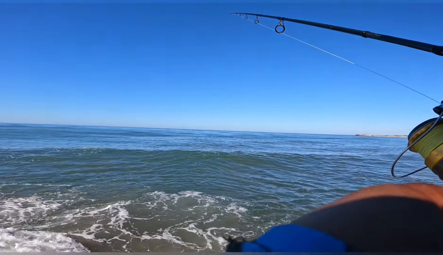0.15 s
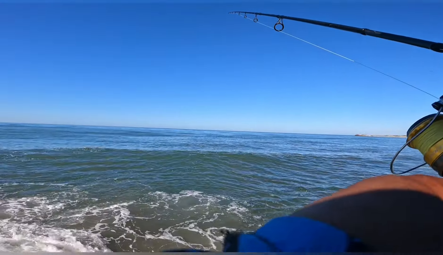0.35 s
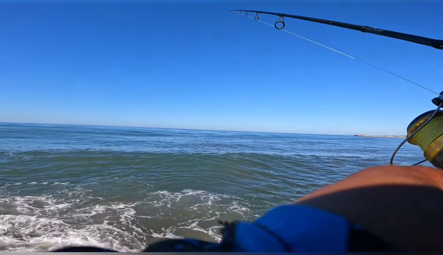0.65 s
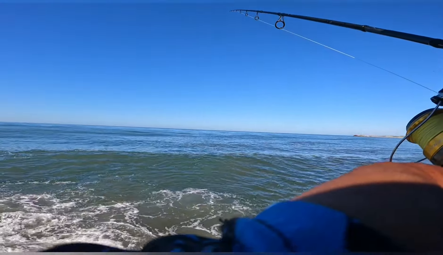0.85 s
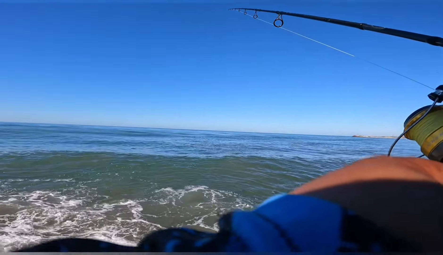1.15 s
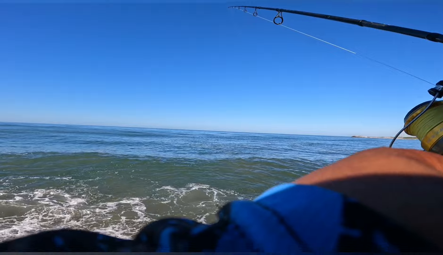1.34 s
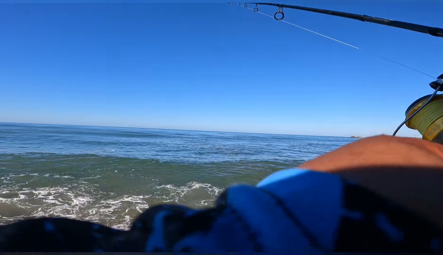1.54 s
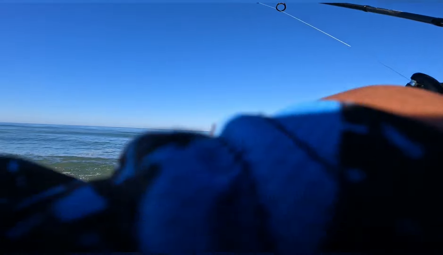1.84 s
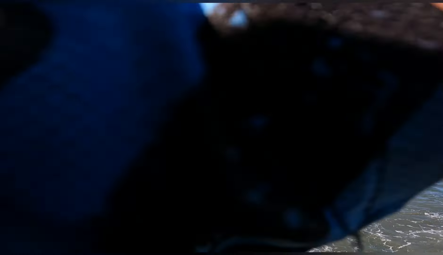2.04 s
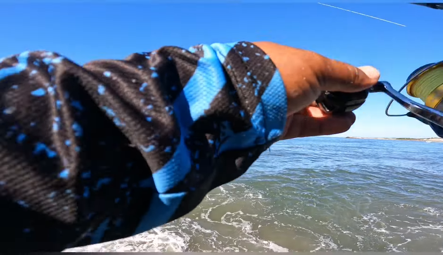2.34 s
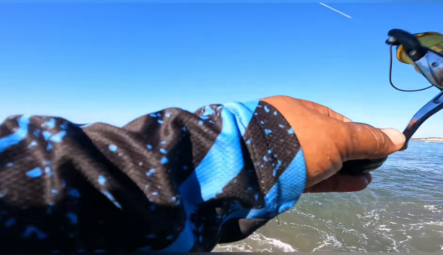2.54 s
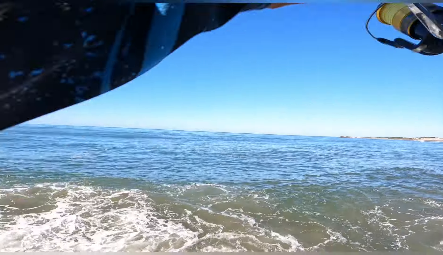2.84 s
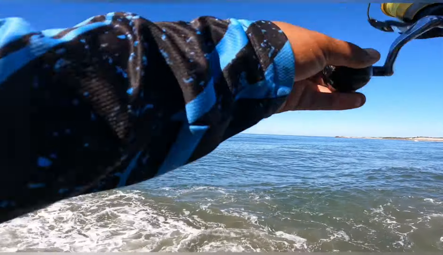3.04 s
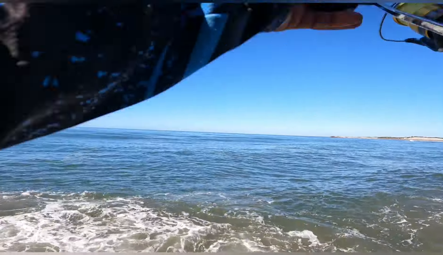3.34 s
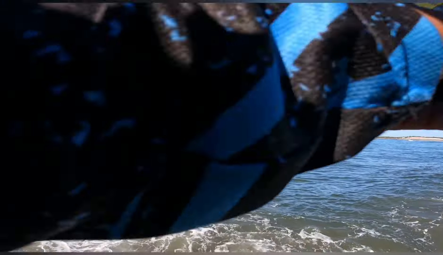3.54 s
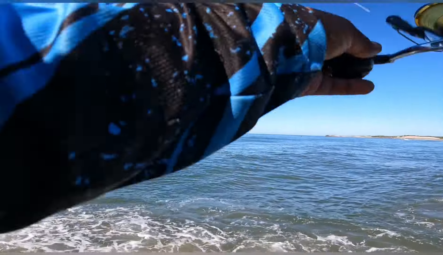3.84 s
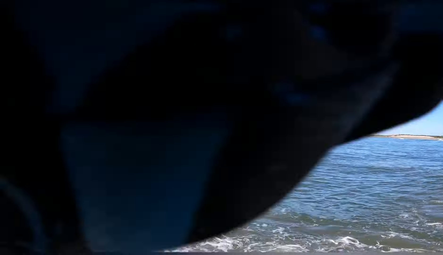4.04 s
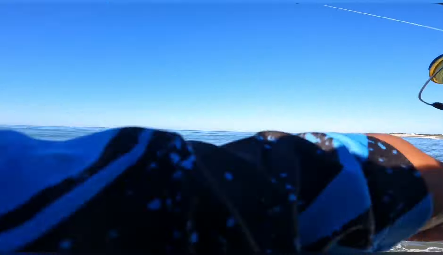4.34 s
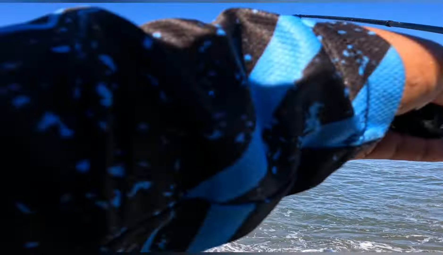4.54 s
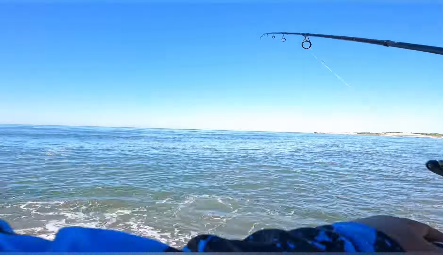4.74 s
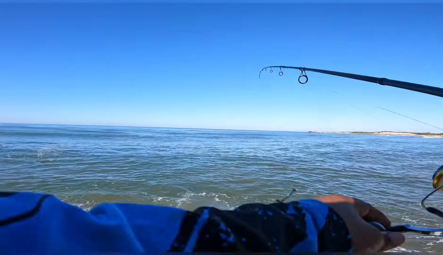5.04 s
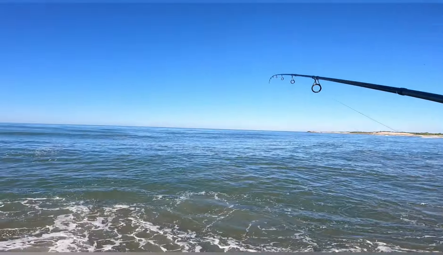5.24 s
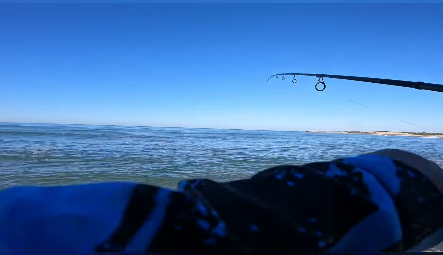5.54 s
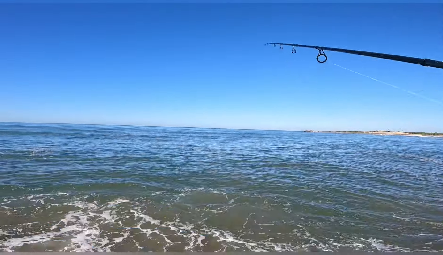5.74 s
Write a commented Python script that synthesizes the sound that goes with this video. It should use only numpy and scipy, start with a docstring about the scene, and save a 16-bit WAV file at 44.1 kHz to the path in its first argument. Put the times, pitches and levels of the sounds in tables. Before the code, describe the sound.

Outdoor seaside fishing heard through a closed waterproof case: deep wind rumble and boxy, tumbling water. The first waves are modest, with small slaps. Cloth scuffs the case near two seconds and soft hollow thuds of fishing tackle follow until about 3.3. Then the surf grows louder and fuller, slapping and plunging among rocks with faint spray and thin high fizz, joined by renewed lumpy gusts.

```python
"""A low roar of surf on jetty rocks and quick buffets of wind come first; a wave surges in halfway.
The microphone sits in a closed waterproof case, so most of the treble is muffled.
The surf is shaped noise and ringing bubbles that swell with each wave; slaps are short noise bands.
Spray and foam are noise with tiny pops; wind is low noise that strikes the case in lumps.
A sleeve brushes the case in bursts of noise, and fishing tackle knocks with a fading tone and a tick."""
import sys
import numpy as np
from scipy import signal
from scipy.fft import rfft, irfft, next_fast_len
from scipy.io import wavfile

SR = 44100
rng = np.random.default_rng(int(sys.argv[2]) if len(sys.argv) > 2 else 0)


def pcm_store(signal):
    """Save signal as 16-bit PCM."""
    levels = np.round(np.clip(np.atleast_2d(signal), -1, 1) * 32767)
    wavfile.write(sys.argv[1], SR, levels.astype(np.int16).T)


N = 259308
TIME = np.arange(N) / SR  # seconds


def gain_of(db):
    """Turns decibels into a factor for the sound pressure."""
    return 10 ** (np.asarray(db) / 20)


def evened(x):
    """Scales a sound to an average strength (rms) of 1."""
    return x / np.sqrt(np.mean(x ** 2) + 1e-20)


def level(rows):
    """Draws a level curve through the rows and gives its gain at every sample."""
    return gain_of(np.interp(TIME, *np.transpose(rows)))


# weak ringing of the case walls: (centre [Hz], width [Hz], lift [dB])
CASE_WALLS = [(645, 74, 0), (1730, 120, 1.5), (2170, 140, 2.5), (2790, 180, 1), (3450, 260, 4)]


def walls(hz):
    """The case walls resonate and lift the sound a little around a few pitches; gain in dB."""
    return sum(db / (1 + (2 * (hz - centre) / width) ** 2) for centre, width, db in CASE_WALLS)


def coloured(x, points):
    """Filters x to a balance of low and high pitches, adds the wall ringing and evens it to rms 1."""
    hz, db = np.transpose(points)
    size = next_fast_len(N + 8192)
    bins = np.fft.rfftfreq(size, 1 / SR)
    colour_db = np.interp(np.log(bins + 1), np.log(hz), db)
    shape = gain_of(colour_db + walls(bins))
    return evened(irfft(rfft(x, size) * shape, size)[:N])


def flutter(slow_hz, fast_hz, depth_db):
    """A gain that wanders irregularly: 40 slow sine waves with random starts, the slower the stronger."""
    rates = np.geomspace(slow_hz, fast_hz, 40)
    t = TIME[::64]
    turns = rates[:, None] * t + rng.random((len(rates), 1))
    wander = np.sin(2 * np.pi * turns).T @ rates ** -.5
    return gain_of(depth_db * np.interp(TIME, t, evened(wander)))


def pops(per_s, spread_db):
    """Single clicks at random moments, most small and a few large."""
    size = gain_of(spread_db * np.minimum(rng.exponential(1, N), 4))
    sign = rng.choice([-1, 1], N)
    return size * sign * (rng.random(N) < per_s / SR)


def bump(s, half_s):
    """A push that builds to 1 at time s and fades gently."""
    return 1 / np.cosh(np.minimum(abs(TIME - s) / half_s, 40))


def lump(noise, s, half_s, hz, span):
    """A short swell of noise from hz / span to hz * span, at rms 1 on its crest."""
    band = signal.butter(3, [hz / span, hz * span], "bandpass", fs=SR, output="sos")
    push = bump(s, half_s)
    sound = push * signal.sosfilt(band, noise)
    return sound * np.linalg.norm(push) / np.linalg.norm(sound)


# knocks of rod and reel, and at 2.083 s the sleeve thudding the case: (time [s], thud level [dB], tick level
# [dB])
TACKLE_KNOCKS = [(1.544, -28.5, -73), (2.083, -14, -80), (2.516, -10.5, -76), (2.784, -10, -71),
                 (3.315, -16, -68)]
# tone of the reel's metal: (frequency [Hz], level [dB])
METAL_COLOUR = [(2500, -13.5), (5000, -1), (7000, 1), (9000, -3.5), (11000, -10.5), (14000, -28)]
KNOCK_HZ, KNOCK_RISE_S = 263, 0.0034
THUD_T60_S, TICK_T60_S = 0.057, 0.06  # time to fade by 60 dB


def tackle():
    """Rod and reel knock, and once the sleeve thuds the case: each a dull fading tone through the angler's body
    and a tiny tick of metal noise."""
    out = np.zeros(N)
    metal = coloured(rng.standard_normal(N), METAL_COLOUR)
    for s, thud_db, tick_db in TACKLE_KNOCKS:
        age = np.clip(TIME - s, 0, 1)
        swell = (1 - np.exp(-age / KNOCK_RISE_S)) ** 2
        thud = gain_of(thud_db - 60 * age / THUD_T60_S) * np.sin(2 * np.pi * KNOCK_HZ * age)
        tick = gain_of(tick_db - 60 * age / TICK_T60_S) * metal
        out += swell * (thud + tick)
    return out


# sleeve brushes: (time [s], rustle level [dB], half length [s], thump level [dB], crisp share [0-1])
SLEEVE_BRUSHES = [(1.863, -56, 0.014, -43, 0.8), (1.952, -53.5, 0.05, -28, 0.34),
                  (2.059, -44.5, 0.008, -28, 0.9), (2.074, -40.5, 0.0029, -22.5, 0.8),
                  (2.089, -43.5, 0.0051, -20, 0.7), (2.115, -47.5, 0.0088, -30, 0.5),
                  (4.166, -39.5, 0.009, -31, 0.08), (4.57, -43.5, 0.016, -26, 0.73),
                  (4.624, -44.5, 0.016, -38, 0), (4.711, -51, 0.043, -42, 0.07),
                  (5.517, -50.5, 0.021, -39.5, 0.5)]
# tone of the crisp slips of cloth: (frequency [Hz], level [dB])
CLOTH_COLOUR = [(300, -16), (900, 4.5), (1500, 1.5), (2100, -1), (2700, 2.5), (3200, -8.5), (3800, -24.5),
                (4700, -22), (5800, -32.5), (7000, -51.5), (10000, -56.5), (12000, -80)]


def sleeve():
    """Cloth drags over the case in crisp tiny slips or a duller rustle, with a soft thump as it nudges."""
    grains = evened(pops(per_s=1200, spread_db=2.0)) + 0.63 * rng.standard_normal(N)
    slips = coloured(grains, CLOTH_COLOUR)
    slips = evened(slips * flutter(slow_hz=72.0, fast_hz=248, depth_db=0.5))
    drag = coloured(rng.standard_normal(N), [(300, -12.5), (900, 2.5), (2000, 6.5), (2600, -13.5),
                                             (3300, -19.5), (4000, -37.5), (7000, -78.0)])
    nudge = coloured(rng.standard_normal(N), [(15, -19.5), (50, 2.5), (110, -2.5), (300, -2.0),
                                              (700, -23.0), (1500, -56.0), (4000, -100)])
    out = np.zeros(N)
    for s, db, half_s, thump_db, crisp in SLEEVE_BRUSHES:
        rustle = np.sqrt(crisp) * slips + np.sqrt(1 - crisp) * drag
        out += bump(s, half_s) * (gain_of(db) * rustle + gain_of(thump_db) * nudge)
    return out


# strength of the wind rumble: (time [s], level [dB])
WIND_LEVEL = [(0, -23.5), (.8, -26.5), (1.15, -28.5), (1.72, -27), (1.8, -34), (2.5, -33), (2.73, -27),
              (3.08, -40.5), (3.5, -33), (3.8, -31.5), (3.9, -30.5), (4.35, -24), (4.72, -30.5),
              (5.05, -21), (5.25, -26.5), (5.88, -25)]
# share of large, slow eddies: (time [s], share [0-1])
LARGE_EDDIES = [(0, 0.29), (.8, 0.85), (2.8, 1), (3.6, 0.24), (5.88, 0.25)]
# tone of the large eddies: (frequency [Hz], level [dB])
LARGE_COLOUR = [(5, -25.5), (20, -10), (30, -7), (42, -2.5), (55, -6), (80, -10), (120, -9.5), (200, -25),
                (400, -37.5), (1200, -72.5), (3000, -115)]
# tone of the small eddies: (frequency [Hz], level [dB])
SMALL_COLOUR = [(5, -26), (20, -15), (38, -10.5), (55, 0.5), (70, 1), (100, -2.5), (135, -3), (200, -14),
                (400, -24), (1200, -72), (3000, -110)]
# single buffets: (time [s], level [dB], half length [s], centre frequency [Hz])
WIND_BUFFETS = [(0.013, -19, 0.0035, 257), (0.051, -19.5, 0.0033, 168), (0.264, -29.5, 0.006, 130),
                (0.39, -20, 0.0099, 150), (0.584, -19.5, 0.0091, 79), (1.083, -27, 0.04, 40),
                (1.68, -30.5, 0.02, 45), (2.793, -29.5, 0.0047, 69.5), (3.912, -21, .008, 115),
                (4.297, -23, 0.036, 95), (4.609, -21, 0.017, 50.2), (4.838, -18.5, 0.012, 94.4),
                (5.069, -20.5, 0.044, 67), (5.096, -19, 0.0075, 230), (5.22, -19, 0.011, 74.5),
                (5.511, -20, 0.017, 66)]


def wind():
    """Large, deep eddies and small, higher ones push unevenly on the case; single buffets strike it."""
    large = np.interp(TIME, *np.transpose(LARGE_EDDIES))
    eddies = np.sqrt(large) * coloured(rng.standard_normal(N), LARGE_COLOUR)
    eddies += np.sqrt(1 - large) * coloured(rng.standard_normal(N), SMALL_COLOUR)
    eddies *= flutter(slow_hz=8.4, fast_hz=29.2, depth_db=0.47)
    air = coloured(rng.standard_normal(N), [(600, -2), (3000, -49.5)])
    buffets = sum(gain_of(db) * lump(air, s, half_s, hz, span=1.93)
                  for s, db, half_s, hz in WIND_BUFFETS)
    return eddies * level(WIND_LEVEL) + buffets


# waves running onto the rocks: (arrival [s], hold [s], roar level [dB], heave level [dB],
# spray level [dB], fizz level [dB])
ROCK_WAVES = [(-0.25, 0.066, -35, -26.5, -52.5, -67), (0.301, 0.093, -35, -39, -61, -76.5),
              (0.698, .1, -35.5, -37, -56, -75), (1.926, 0.34, -32.5, -42, -58.5, -67),
              (2.593, .12, -35, -31.5, -52, -63), (3.179, 0.4, -25.5, -24.5, -50.5, -59.5),
              (3.718, .15, -27.5, -25, -51, -61), (4.206, 0.2, -27, -25.5, -51, -60),
              (4.892, 0.018, -27.5, -29, -53.5, -64), (5.408, 0.2, -28.5, -34.5, -53, -69)]
WAVE_RISE_S = 0.17


def surf(column, calm_db, fall_db_per_s, lag_s=0):
    """Gain of one part of the surf: waves build, hold and drain, adding their power to the calm wash."""
    power = gain_of(calm_db) ** 2
    for s, hold_s, *levels in ROCK_WAVES:
        db = dict(zip(("roar", "heave", "spray", "fizz"), levels))[column]
        age = TIME - s - lag_s
        build = np.clip(age / WAVE_RISE_S, 0, 1)
        draining_s = np.maximum(age - WAVE_RISE_S - hold_s, 0)
        power = power + (build * gain_of(db - fall_db_per_s * draining_s)) ** 2
    return np.sqrt(power)


# tone of the foam, a high band let through by the case: (frequency [Hz], level [dB])
FOAM_COLOUR = [(9000, -91.5), (10000, -71.5), (10600, -46.5), (11000, -19), (11600, -4.5), (11950, -0.5),
               (12600, -5.5), (13600, -7), (14100, -11.5), (14700, -18.5), (15600, -16.5)]


def foam():
    """Tiny bubbles burst as random pops over a steady hiss, heard as a fluttering high fizz."""
    bursts = evened(pops(per_s=1300, spread_db=0.5)) + rng.standard_normal(N)
    froth = surf("fizz", calm_db=-70, fall_db_per_s=10.5)
    return froth * coloured(bursts, FOAM_COLOUR) * flutter(slow_hz=12, fast_hz=130, depth_db=1.0)


# handfuls of spray landing on stone: (time [s], level [dB], half length [s])
SPRAY_SPATTERS = [(.33, -58.5, .03), (0.482, -61, .04), (1.228, -57.5, .05), (2.818, -52.5, .025),
                  (3.38, -51.5, .03), (3.778, -49, .025), (4.013, -52, .04), (4.83, -47.5, .025),
                  (5.152, -55.5, .04), (5.792, -53, .03)]
# tone of the spray: (frequency [Hz], level [dB])
SPRAY_COLOUR = [(700, -32), (1200, 2), (1500, 0), (1800, -1), (2300, -7), (2800, -13), (3150, -24),
                (3900, -35.5), (4900, -37.5), (6000, -46), (6700, -69.5), (10000, -91)]


def splash():
    """Spray falls on water and stone as dense pops in noise, swelling with waves and heavier spatters."""
    drops = evened(pops(per_s=1500, spread_db=2.5)) + gain_of(4.0) * rng.standard_normal(N)
    spray = surf("spray", calm_db=-56, fall_db_per_s=4)
    spray *= flutter(slow_hz=1.7, fast_hz=5.6, depth_db=0.17)  # lapping water
    spatter = sum(gain_of(db) * bump(s, half_s) for s, db, half_s in SPRAY_SPATTERS)
    clumps = flutter(slow_hz=6.5, fast_hz=48.6, depth_db=0.57)
    return np.hypot(spray, spatter) * coloured(drops, SPRAY_COLOUR) * clumps


# slaps and plunges of water: (time [s], level [dB], half length [s], centre frequency [Hz])
WATER_SLAPS = [(0.156, -29, .003, 694), (0.468, -22.5, .005, 654), (0.553, -31, 0.0043, 650),
               (0.776, -33.5, 0.021, 757), (0.854, -29, 0.054, 358), (1.089, -34.5, 0.038, 720),
               (1.43, -30.5, 0.029, 217), (2.69, -40, 0.014, 1300), (3.327, -27.5, 0.024, 696),
               (3.424, -32.5, .016, 1260), (3.54, -28.5, .05, 611), (3.621, -22, 0.033, 241),
               (3.63, -36.5, 0.02, 1150), (3.81, -25.5, .05, 222), (3.887, -17, 0.0049, 600),
               (3.98, -22.5, .09, 445), (4.087, -29.5, .04, 730), (4.233, -23.5, .018, 500),
               (4.606, -22, 0.018, 685), (4.77, -23, .05, 444), (4.89, -22.5, 0.0033, 715),
               (5.092, -28, 0.061, 506), (5.718, -21.5, 0.015, 209), (5.78, -32.5, 0.16, 865)]


def slaps():
    """Water slaps a rock or plunges into a gap: short swells of noise, each around its own pitch."""
    water = coloured(rng.standard_normal(N), ROAR_COLOUR)
    return sum(gain_of(db) * lump(water, s, half_s, hz, span=1.4) for s, db, half_s, hz in WATER_SLAPS)


def bubbles(low_hz, high_hz, cycles, rise, per_s, count=24):
    """Trapped air rings and dies away, each bubble rising in pitch as it nears the surface."""
    out = np.zeros(N)
    for hz in np.geomspace(low_hz, high_hz, count):
        age = np.arange(0, 5, hz / cycles / SR)  # in fade times, each lasting the given cycles
        ring = np.sin(2 * np.pi * cycles * age * (1 + rise * age)) * np.exp(-age)
        out += signal.oaconvolve(pops(per_s / count, spread_db=4.0), ring)[:N]
    return evened(out)


# tone of the tumbling water inside the case: (frequency [Hz], level [dB])
ROAR_COLOUR = [(150, -37), (300, -4.5), (380, 0), (470, -2), (570, -0.5), (740, 0), (860, -3.5),
               (1000, -9.5), (1250, -18), (1500, -34.5), (2200, -56), (3500, -100)]
# tone of the hollow heave: (frequency [Hz], level [dB])
HEAVE_COLOUR = [(60, -36), (110, -11), (148, -2.5), (200, 0.5), (250, -0.5), (320, -3), (400, -11.5),
                (600, -34), (1500, -91)]


def roar():
    """White water tumbles as noise with bubbly gurgles; a hollow heave follows as rock gaps fill."""
    gurgle = bubbles(low_hz=334.4, high_hz=1188, cycles=9.8, rise=0.019, per_s=300)
    water = coloured(rng.standard_normal(N), ROAR_COLOUR)
    water = evened(water + gain_of(-7.5) * coloured(gurgle, ROAR_COLOUR))
    water *= flutter(slow_hz=14, fast_hz=42.4, depth_db=.5)
    heave = coloured(rng.standard_normal(N), HEAVE_COLOUR)
    water *= surf("roar", calm_db=-31, fall_db_per_s=6)
    heave *= surf("heave", calm_db=-32.5, fall_db_per_s=7.5, lag_s=0.19)
    return water + heave


def scene():
    """Adds tackle, cloth, wind and water at one microphone."""
    return (tackle() + sleeve() + wind() + foam() + splash() + slaps() + roar())[None]


def record(dry):
    """The recorder cuts off everything above about 15.7 kHz."""
    lowpass = signal.firwin(1023, 15700, window=("kaiser", 9), fs=SR)
    return signal.oaconvolve(dry, lowpass[None], "same")


dry = scene()
out = record(dry)
pcm_store(out)
```